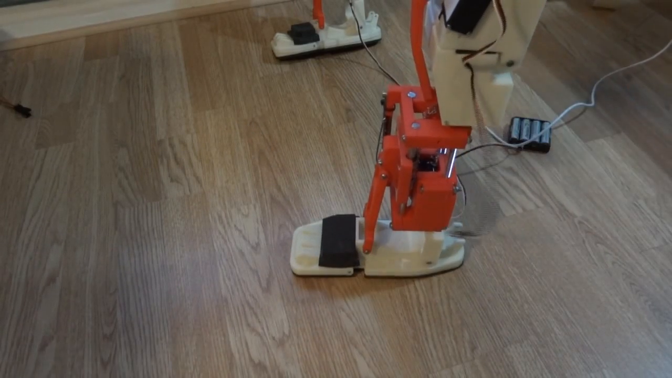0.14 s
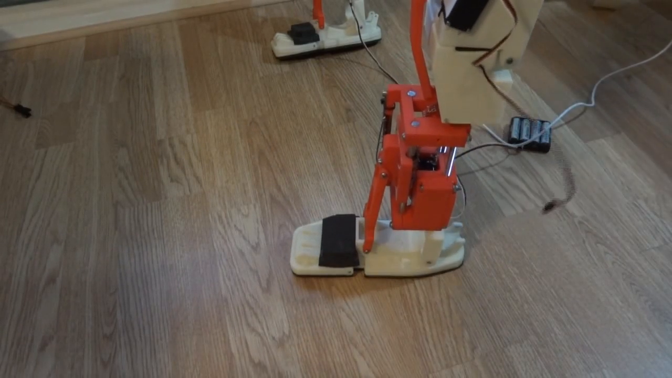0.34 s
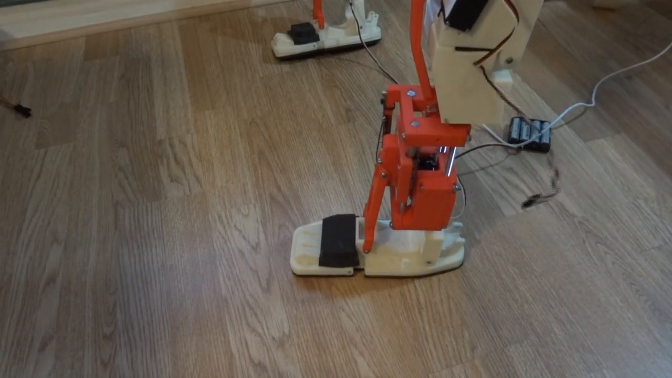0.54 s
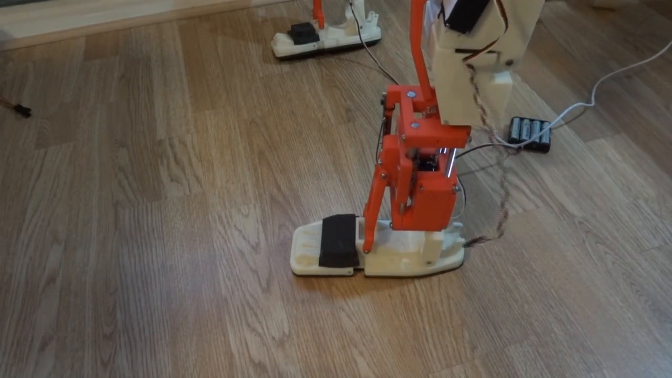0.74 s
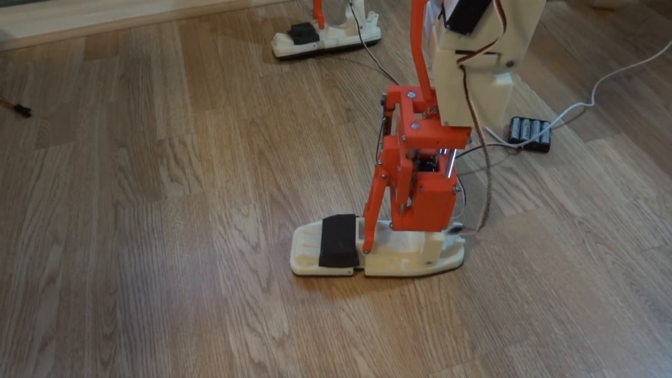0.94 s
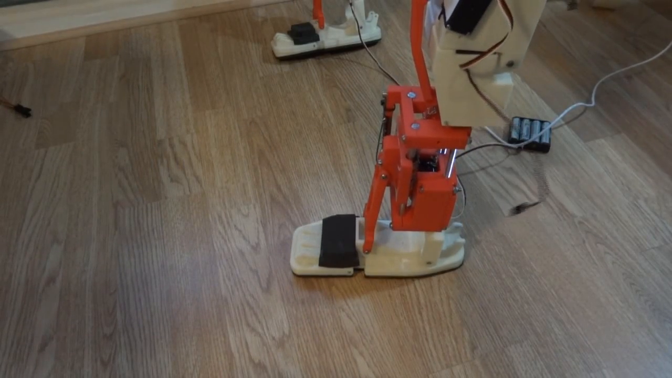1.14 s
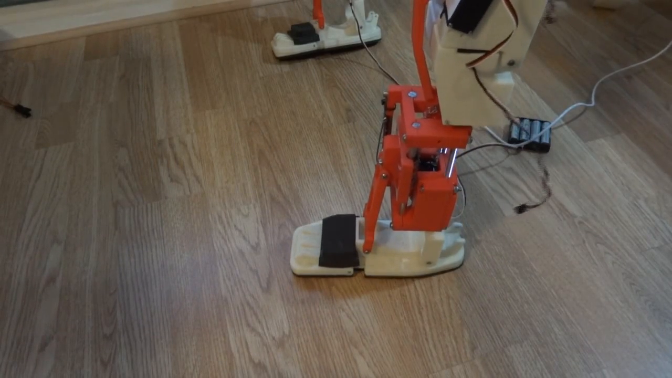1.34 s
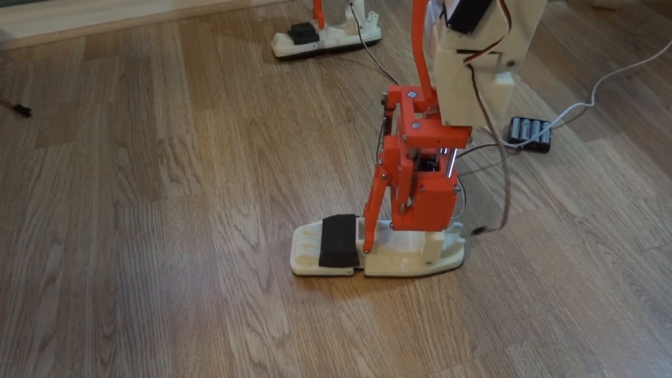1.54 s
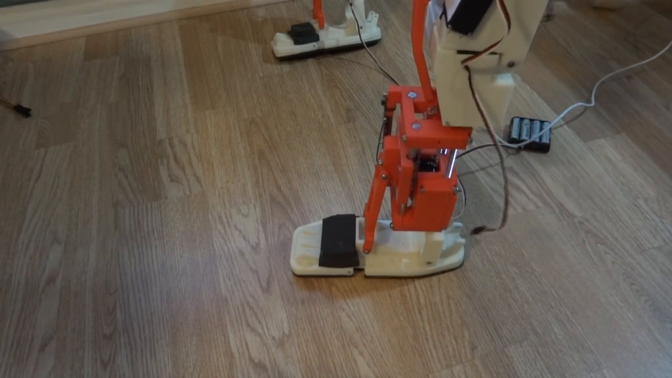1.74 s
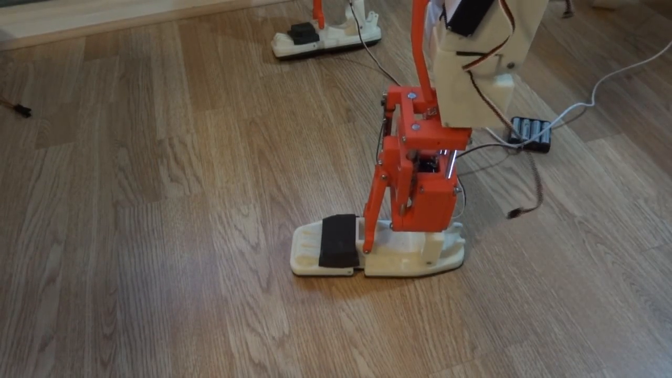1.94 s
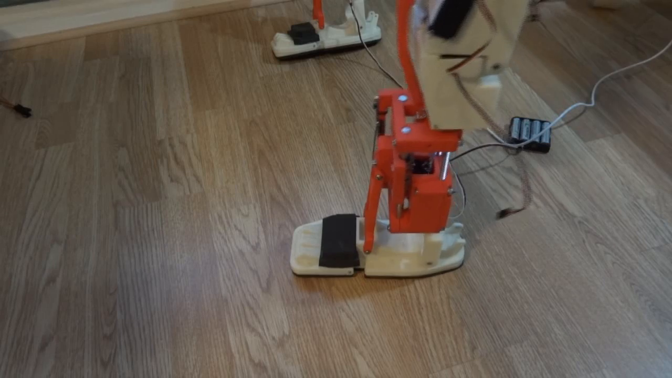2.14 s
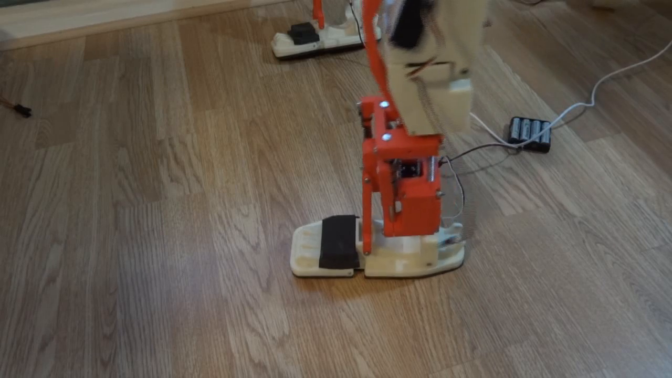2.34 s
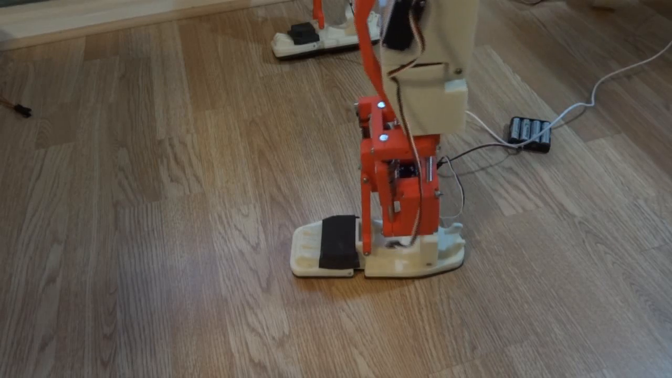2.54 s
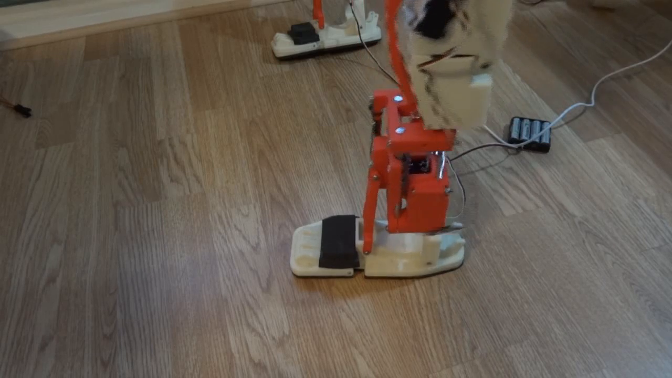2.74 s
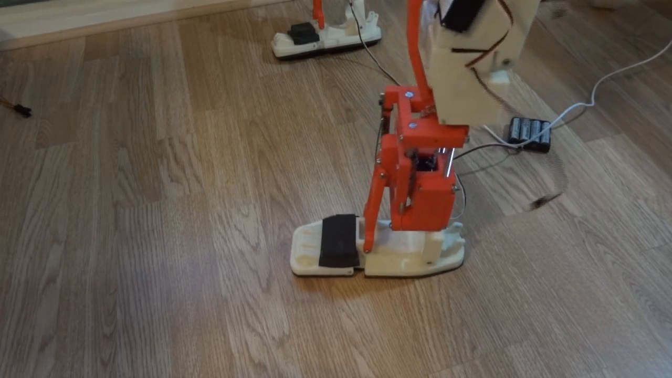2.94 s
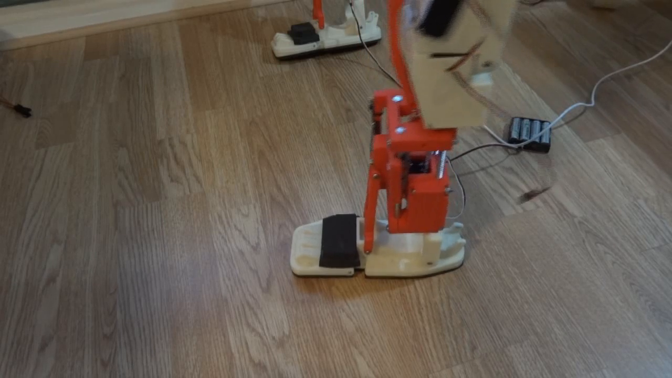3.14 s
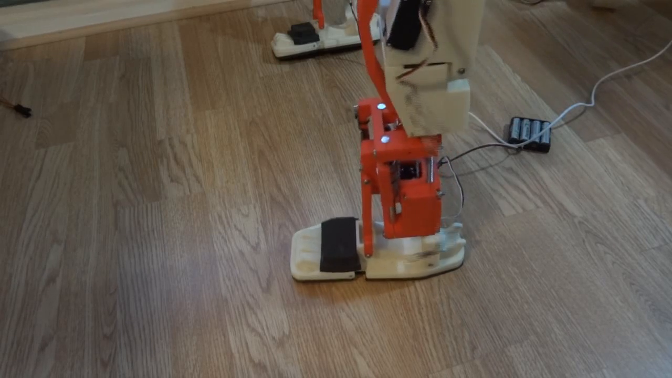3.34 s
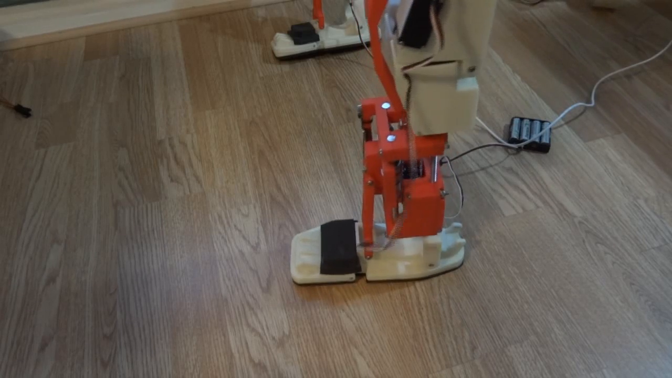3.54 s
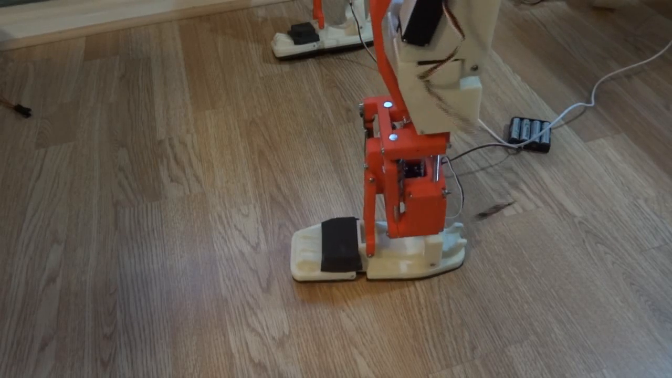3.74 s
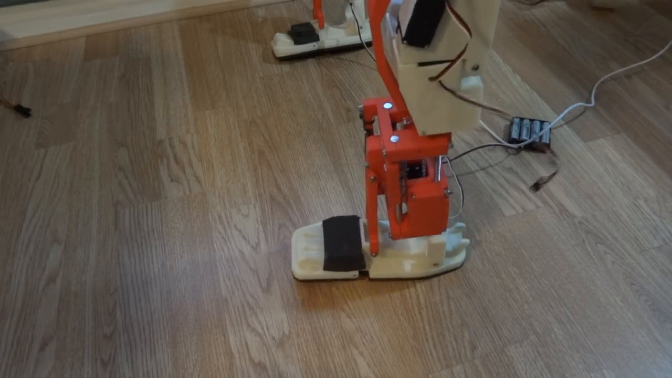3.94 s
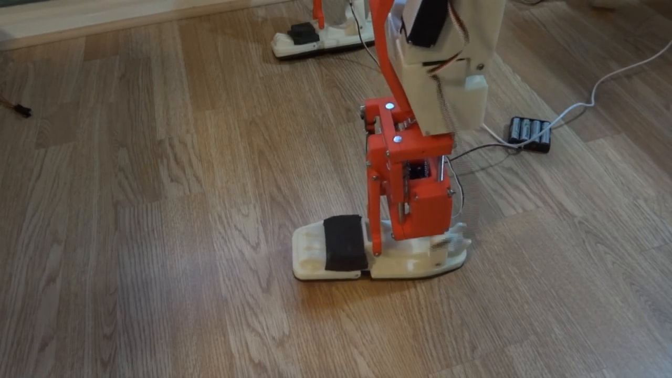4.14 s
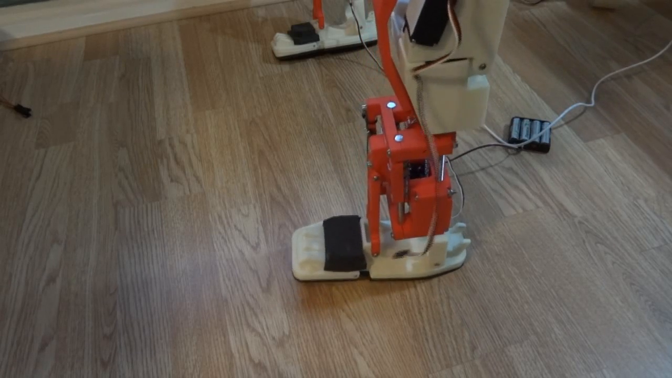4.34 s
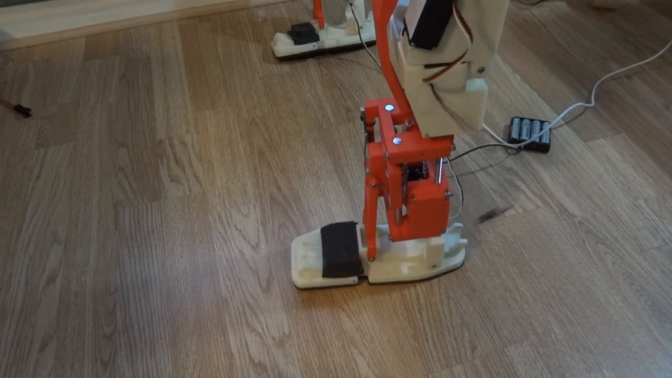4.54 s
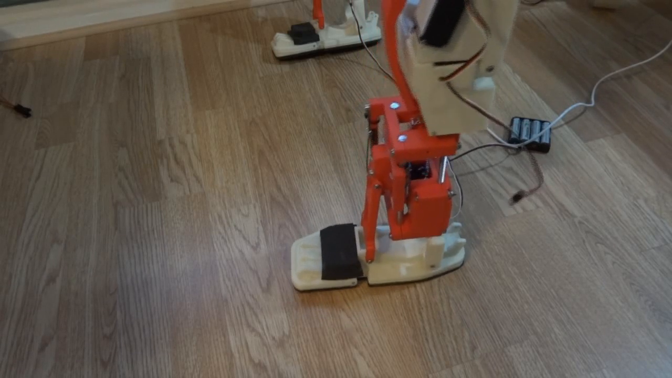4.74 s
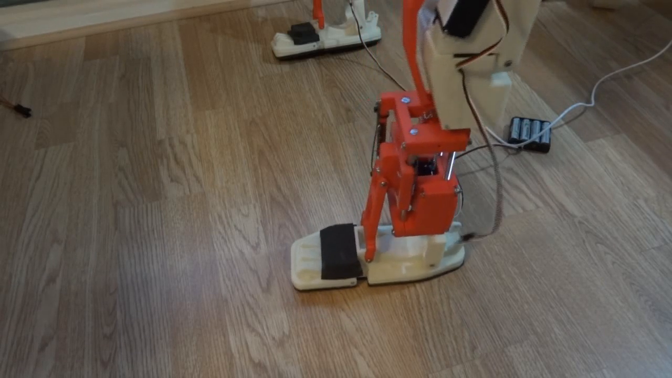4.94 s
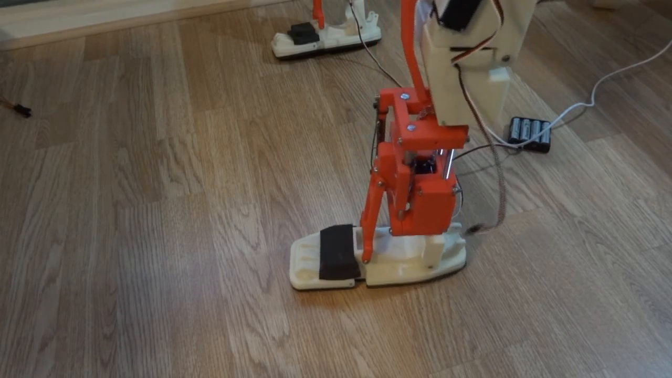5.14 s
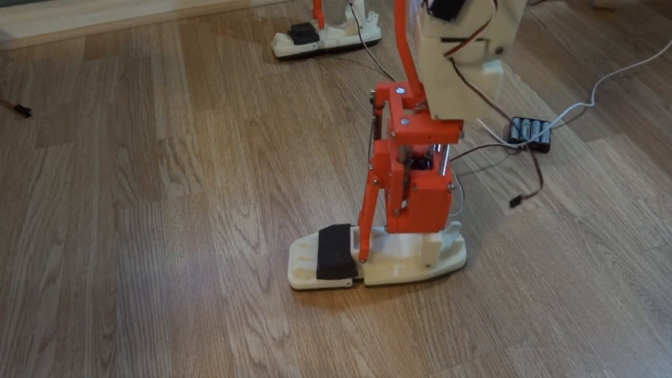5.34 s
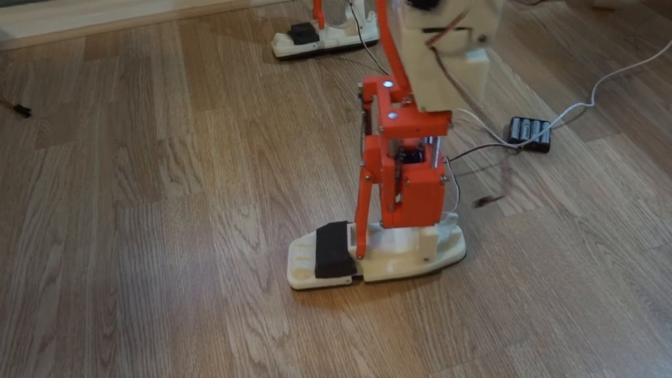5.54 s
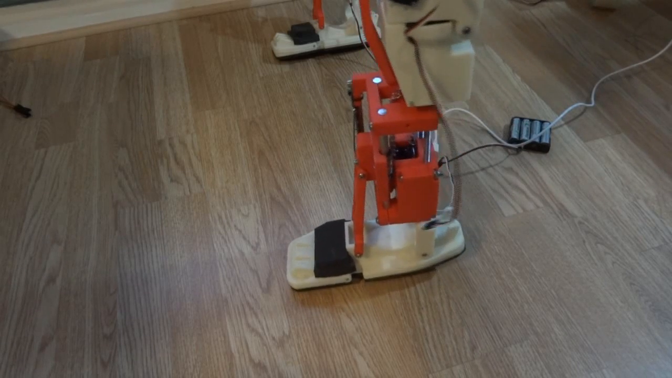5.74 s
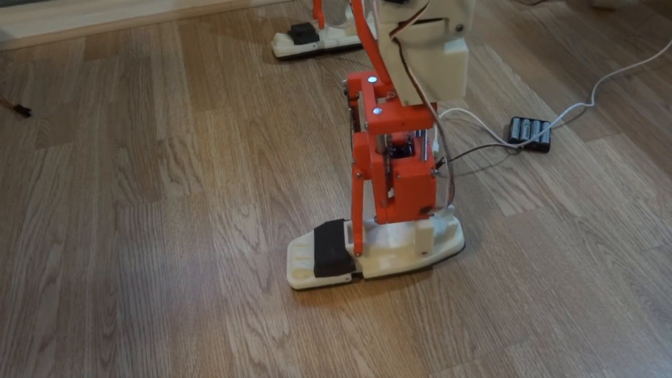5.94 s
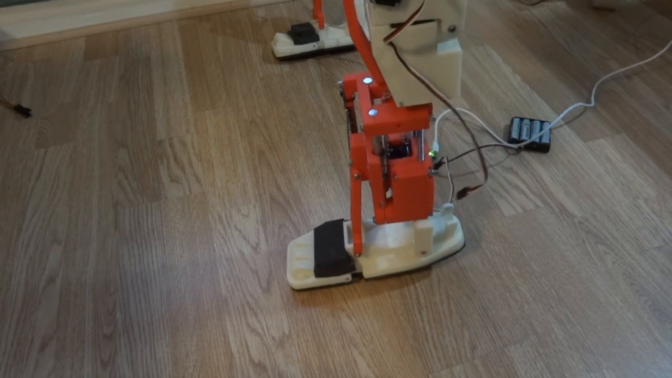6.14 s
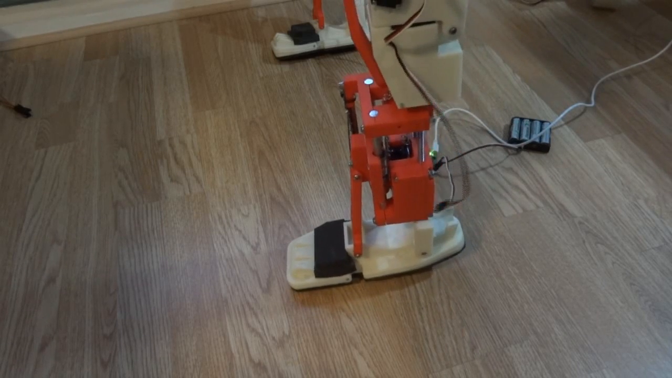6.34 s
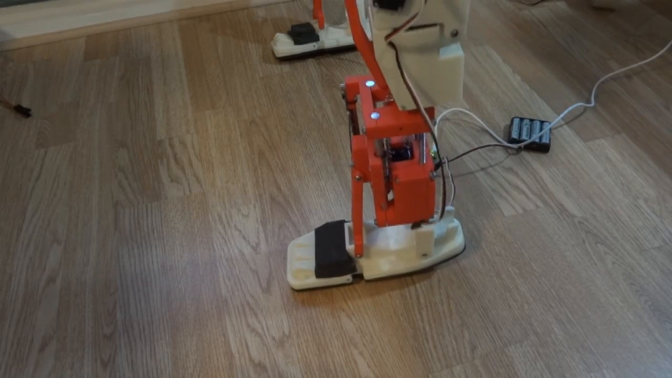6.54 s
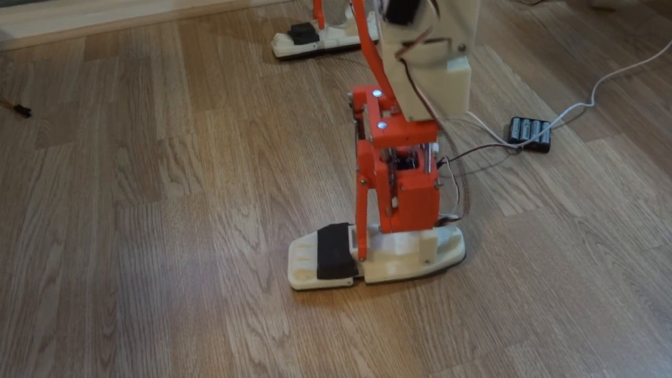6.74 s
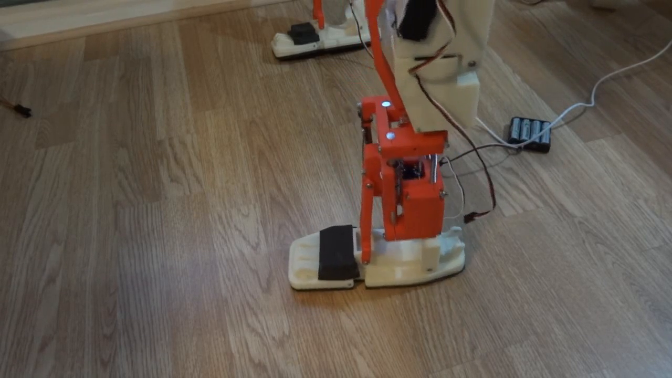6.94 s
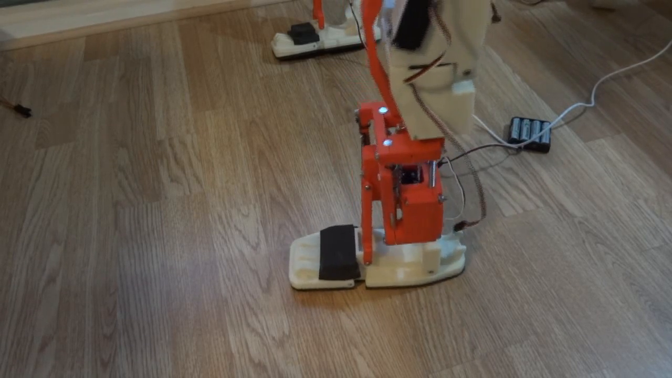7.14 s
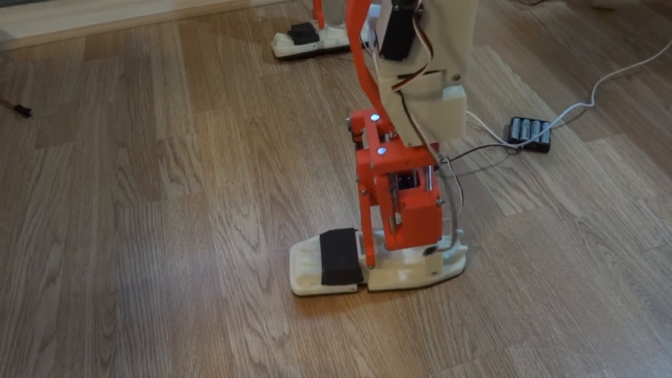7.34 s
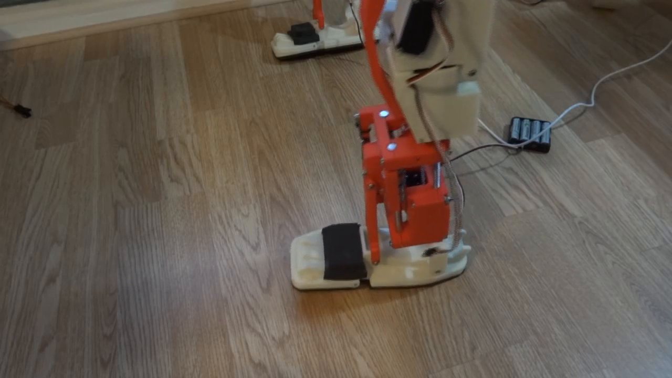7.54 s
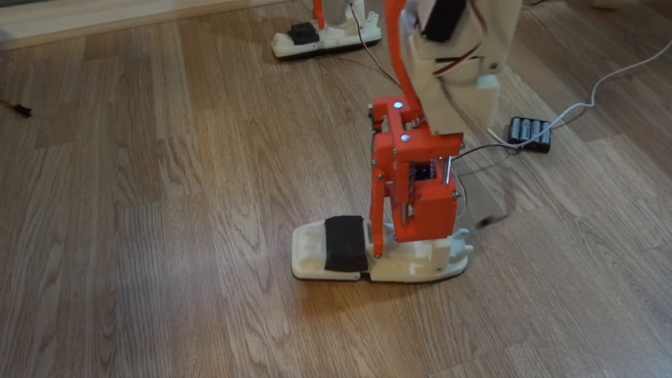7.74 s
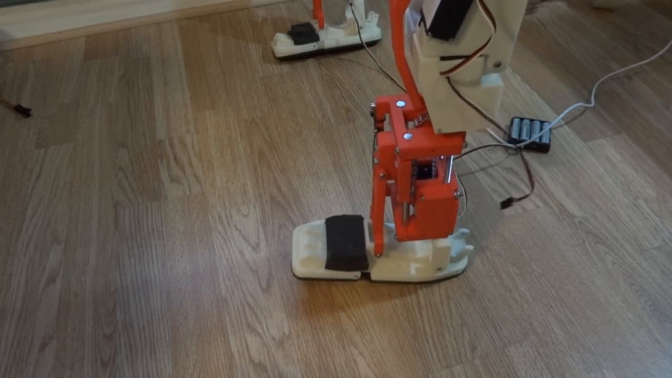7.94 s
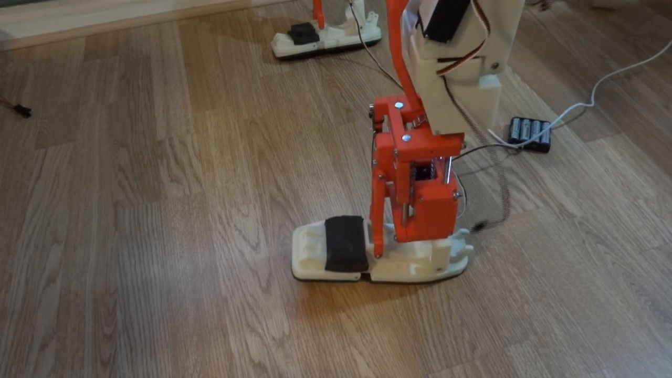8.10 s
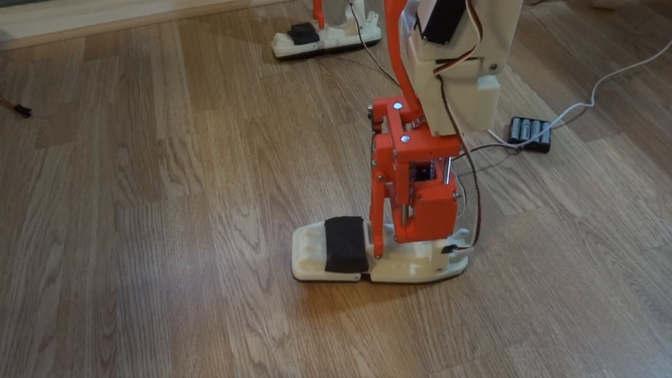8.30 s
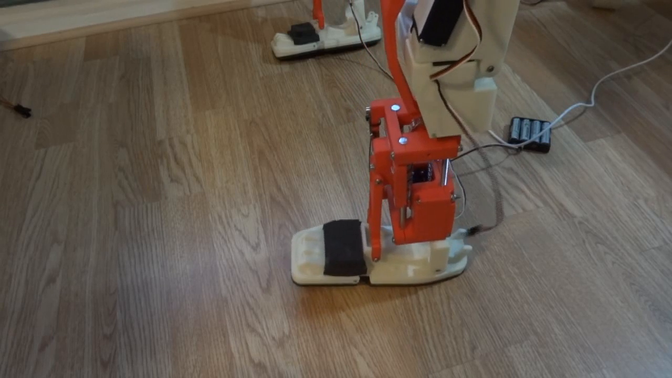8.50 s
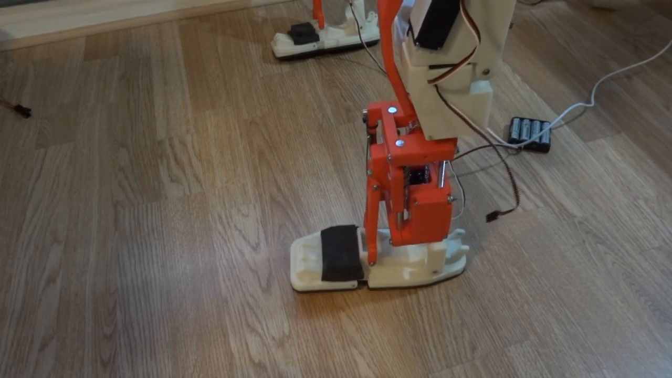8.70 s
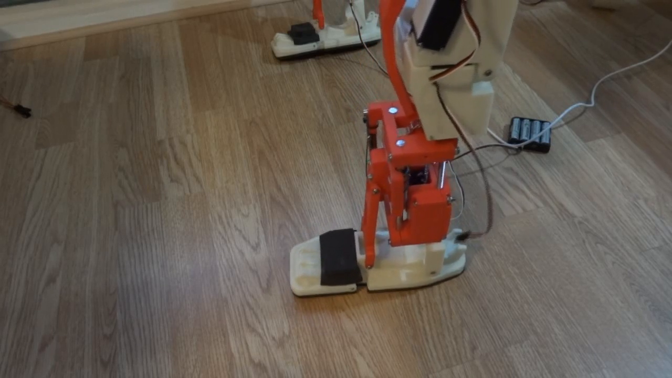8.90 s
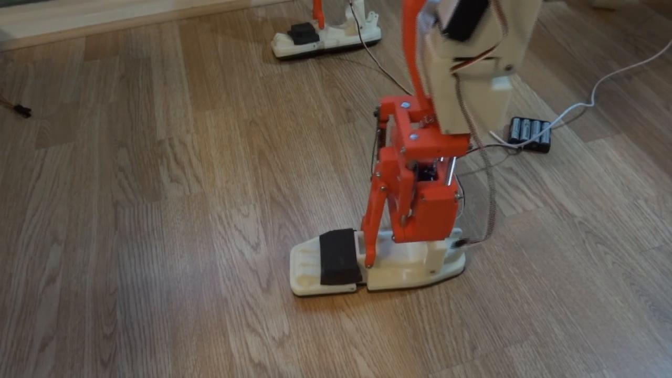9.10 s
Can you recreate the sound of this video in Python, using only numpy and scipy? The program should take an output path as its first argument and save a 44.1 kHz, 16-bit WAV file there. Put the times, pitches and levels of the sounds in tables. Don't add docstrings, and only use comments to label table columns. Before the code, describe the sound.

A robot ankle's small motors, heard closely on a wooden floor. First a low electrical buzz with dull knocks, cable scuffs and a dry plastic slip; then four brief gritty whines. Three longer runs follow, thin and rattly while climbing, louder and rougher as they slow down. Buzzing pauses, small ticks and soft board rumble lie between, over faint room hiss.

```python
import sys
import numpy as np
from scipy import signal
from scipy.fft import rfft, irfft, next_fast_len
from scipy.io import wavfile
from scipy.ndimage import uniform_filter1d

SR = 44100
rng = np.random.default_rng(int(sys.argv[2]) if len(sys.argv) > 2 else 0)


def generate_wav(signal):
    frames = np.transpose(np.atleast_2d(signal))
    scaled = np.clip(frames, -1, 1) * 32767
    pcm = np.round(scaled).astype(np.int16)
    wavfile.write(sys.argv[1], SR, pcm)


def convert_level_to_amplitude(level_db):
    exponent = np.asarray(level_db, float) / 20
    return 10 ** exponent


N = 404397

# pitch_hz, level_db (per Hz)
ROOM_NOISE = [(15, -36), (28, -16), (140, -5.5), (400, -7.5), (880, -11), (1050, 2), (1250, -13),
              (1700, -8), (2400, -16), (2900, -18.5), (5900, -24.5), (13000, -30.5), (15600, -33.5)]
# pitch_hz, likeness (1 = the same)
LIKENESS = [(60, 1), (240, 0.31), (950, 0.68), (3770, 0.67), (15000, 0.92)]
# pitch_hz, level_db
SUPPLY_LINES = [(6966, -69), (13932, -63.5)]
ROOM_DB, ROOM_FOLLOWS = -61.5, 0.18
ROOM_T60_S, WALL_CUT_HZ = 0.35, 8000

# time_s, deep_db, shaft_thud_db, board_db
SHIFTS = [(0.64, -73, -65, -63), (2.33, -51.5, -56, -61.5), (2.7, -59, -50, -58.5),
          (3.3, -50.5, -61, -55.5), (4.05, -54, -63.5, -58), (4.6, -59, -55.5, -59.5),
          (4.95, -58, -49.5, -57), (6.95, -70, -50, -60), (7.2, -52, -51.5, -49), (7.6, -55, -61.5, -55),
          (8.35, -62, -102, -49), (9.05, -62, -52, -55)]
SHIFT_RISE_DB_PER_S, SHIFT_FALL_DB_PER_S, REST_DB = [57, 44, 29], [91, 38, 23.5], [-80, -72.5, -73]

# time_s, peak_db, pitch_hz, crack_db (against the thump)
BUMPS = [(0.135, -37, 330, -8.5), (0.254, -55, 231, -4), (0.435, -44, 199, -18), (0.454, -34.5, 180, -27),
         (0.535, -35, 178, -24), (0.586, -30.5, 170, -28), (0.63, -37.5, 137, -20), (0.74, -36.5, 576, -12),
         (0.763, -32.5, 338, -18), (8.318, -65, 223, 8)]
# time_s, peak_db
SLIPS = [
    (1.588, -31),
    (1.5974, -38),
]
# time_s, low_db, high_db
SCUFFS = [
    (0.148, -63, -59),
    (0.598, -40.5, -53),
    (0.76, -48, -54.5),
]
SCUFF_RISE_DB_PER_S, SCUFF_FALL_DB_PER_S = [63, 36], [200, 58]
CONTACT = 14

# start_s, end_s, tooth_rate_hz, level_db
NEIGHBOUR = [
    (6.53, 6.64, 1500, -40.5),
    (3.655, 3.73, 1985, -35),
]

# start_s, end_s, first_db, last_db
HOLD = [
    (0, 1.46, -51.5, -50.5),
    (1.474, 1.937, -52, -52),
    (4.1, 4.345, -50, -47.5),
    (5.451, 5.634, -44.5, -56),
    (5.626, 6.599, -55, -45.5),
    (7.598, 8.478, -51.5, -52),
]
FRAME_HZ = 50.12
# time_ms, level_db
UPRIGHT = [(15.6, 0), (17.2, -4), (19.6, -7), (1.6, -4), (5.3, -9), (10.6, -15)]
# time_ms, level_db
LEANING = [(.6, 0), (2.8, -10), (4.2, -8), (8.4, -15), (12.6, -14), (17, -12), (18.2, -8)]
# pitch_hz, width_hz, level_db
HOLD_MODES = [(1078, 120, -8), (1506, 357, -2), (1578, 212, 6.5), (2380, 430, -16.5)]
# time_s, peak_db
TWITCHES = [(5.544, -40), (5.5851, -36.5), (5.647, -38), (5.668, -41), (5.7253, -38), (5.7662, -36.5),
            (5.846, -42), (5.866, -39.5), (5.904, -48), (5.964, -51), (5.9845, -43), (6.005, -41),
            (6.0242, -38), (6.0464, -36), (6.184, -42), (6.223, -43), (8.341, -44), (8.422, -38)]

# time_s, tooth_rate_hz
STEP_SPEED = [
    [(2.03, 1007), (2.085, 1323), (2.115, 1327), (2.16, 1270), (2.21, 1436), (2.27, 1423), (2.315, 1316),
     (2.39, 945), (2.44, 600)],
    [(2.555, 705), (2.59, 1083), (2.645, 1373), (2.765, 1521), (2.82, 1544), (2.905, 1508), (2.925, 1295),
     (2.955, 650)],
    [(2.97, 802), (2.99, 1150), (3.025, 1405), (3.065, 1503), (3.325, 1482), (3.355, 1390), (3.385, 1204),
     (3.42, 650)],
    [(3.67, 803), (3.695, 1150), (3.725, 1343), (3.765, 1433), (3.97, 1397), (4.01, 1334), (4.06, 1138),
     (4.11, 650)],
]
# time_s, tooth_rate_hz
SWING_SPEED = [
    [(4.31, 1147), (4.355, 1452), (4.39, 1634), (4.47, 1810), (4.68, 1814)],
    [(4.735, 1685), (4.92, 1288), (4.99, 1282), (5.075, 1083), (5.13, 944), (5.21, 1032), (5.3, 931)],
    [(6.6, 1210), (6.68, 1210), (6.755, 1300), (6.825, 1600), (6.885, 1743), (6.995, 1846), (7.09, 1872)],
    [(7.125, 1774), (7.18, 1618), (7.45, 1352), (7.515, 1225), (7.57, 896.5)],
    [(8.51, 1348), (8.595, 1405), (8.65, 1527), (8.735, 1474), (8.76, 1608), (8.8, 1626), (8.835, 1726),
     (8.915, 1676)],
    [(8.98, 1473), (9.15, 1333)],
]
# start_s, brake_s, low_whine_db, high_whine_db, rattle_db
LOADED = [
    (1.964, 2.398, -30, -24.5, -26.5),
    (2.542, 2.922, -27, -20, -25.5),
    (2.96, 3.37, -27.5, -22, -24.5),
    (3.649, 4.065, -30.5, -23, -23.5),
    (4.662, 5.283, -27.5, -21, -26.5),
    (7.093, 7.558, -29, -24, -24.5),
    (8.913, 9.3, -29, -23.5, -27.5),
]
RISE_S = [0.075, 0.029, 0.045, 0.049, 0.093, 0.027, .08]
SHUDDER = [.4, .1, .05, .1, .22, .12, .4]
# start_s, end_s, whine_db, rattle_db, clatter_db
FREE = [
    (3.475, 3.612, -95, -48, -45.5),
    (4.313, 4.707, -62, -45.5, -48.5),
    (5.28, 5.431, -95, -34, -49.5),
    (6.53, 6.954, -44, -37.5, -44.5),
    (8.481, 8.933, -61.5, -45, -48),
]
SLACK_DB = [0, 12, 0, 2, 11]
# time_s, level_db
JOLTS = [
    (1.974, -38),
    (4.29, -36),
    (6.522, -42),
    (8.42, -46),
    (8.44, -37),
]
JOLT_RISE_S, JOLT_HOLD_S, JOLT_DB_PER_S = .006, .022, 270
JOLT_CLATTER_DB, JOLT_HISS_DB = -12.5, -26

NOMINAL_HZ = 1500
COAST_DB_PER_S, UNMESH_DB_PER_S = 155, 220
BRAKE_DB, BRAKE_S = 3.5, 0.076
STALL_HZ, STALL_DB_PER_OCT = 1348, 32.5
TAKE_UP_MESH_S = 0.085
MESH_LAG_S, MESH_RISE_S, MESH_LEAD_S = 0.017, 0.093, 0.031
CLATTER_DB, CLATTER_DB_PER_OCT = -53.5, -13
HISS_DB, FREE_HISS_DB, HISS_DB_PER_OCT = -50, -55, 11
FIRST_DB, FIRST_DB_PER_OCT = -17.5, 39
FREE_HIGH_DB, FREE_WHINE_DB_PER_OCT = -3, -10
FREE_RISE_S, FREE_DB_PER_OCT = .05, -0.5

# pitch_hz, level_db
WHINE = [(1500, -7.5), (2900, 4.5), (3600, -1), (4500, 3.5), (5500, -4), (7000, -6), (9000, -6),
         (11500, -14.5), (15500, -43)]
# tooth_rate_multiple, level_db (against
HIGH_ORDERS = [(6.28, -13), (6.6, -9), (7.3, -15)]
# tooth_rate_multiple, level_db (against the tooth rate tone)
SIDE_ORDERS = [(0.898, -12), (1.1, -6.5), (1.302, -16), (1.5, -5), (2.399, -9.5), (2.5, -20)]
# pitch_hz, width_hz, level_db
CASE_MODES = [(1683, 230, -1), (1897, 68, -2.5), (2210, 80, 0.5), (2530, 68, 2.5), (2935, 240, 3),
              (3605, 150, -7.5)]
# pitch_hz, level_db (per Hz)
RATTLE = [(350, -37.5), (600, -37.5), (807, -55), (1020, -16), (1220, -16), (1600, -21.5), (2350, -9.5),
          (3000, -6), (3320, -2.5), (4530, 3.5), (7770, -1.5), (9180, -3), (13000, -12.5)]
TOP_HZ = 15760


def rms_one(x):
    return x / np.sqrt(np.mean(x ** 2) + 1e-20)


def in_time(rows):
    s, *columns = np.transpose(rows)
    return [np.interp(np.arange(N) / SR, s, c) for c in columns]


def at_hz(points, hz):
    points = np.array(points)
    return np.interp(np.log(hz), np.log(points[:, 0]), points[:, 1])


def drift(rate):
    r = np.exp(-40 * np.pi * rate / SR)
    slow = signal.lfilter([1], [1, -2 * r, r * r], rng.standard_normal(N // 20 + 2002))[2000:]
    return np.interp(np.arange(N) / 20, np.arange(len(slow)), rms_one(slow))


def resonate(x, hz, width):
    r = np.exp(-np.pi * width / SR)
    top = np.array([1, 0, -1]) * (1 - r * r) / 2
    return signal.lfilter(top, [1, -2 * r * np.cos(2 * np.pi * hz / SR), r * r], x + 1e-18)


def colour(x, spectrum):
    size = next_fast_len(N)
    hz = np.maximum(np.arange(size // 2 + 1) * SR / size, 1)
    return rms_one(irfft(rfft(x, size) * convert_level_to_amplitude(at_hz(spectrum, hz)), size)[..., :N])


def band(low_hz, high_hz):
    sos = signal.butter(2, [low_hz, high_hz], "band", fs=SR, output="sos")
    return rms_one(signal.sosfilt(sos, rng.standard_normal(N)))


def swells(rows, rise_db_per_s, fall_db_per_s):
    t = np.arange(0, N + 64, 64)[:, None] / SR
    levels = []
    for s, *db in rows:
        away_db = np.maximum((s - t) * rise_db_per_s, (t - s) * fall_db_per_s)
        levels.append(np.array(db) - away_db)
    return np.array(in_time(np.c_[t, np.max(levels, axis=0)]))


def stroke(start, end, rise_s, fall_db_per_s):
    t = np.arange(N) / SR
    return np.clip((t - start) / rise_s, 0, 1) * convert_level_to_amplitude(-fall_db_per_s * np.maximum(t - end, 0))


def floor_levels():
    shifts = swells(SHIFTS, SHIFT_RISE_DB_PER_S, SHIFT_FALL_DB_PER_S)
    return np.maximum(shifts, np.array(REST_DB)[:, None])


def ambience():
    room_db = ROOM_DB + ROOM_FOLLOWS * (floor_levels()[2] - REST_DB[2])
    hz = np.geomspace(20, 20000, 40)
    alike = np.clip(at_hz(LIKENESS, hz), -.999, .999)
    level_db = at_hz(ROOM_NOISE, hz)
    side_db = level_db + 10 * np.log10((1 - alike) / (1 + alike))
    mid = colour(rng.standard_normal(N), np.c_[hz, level_db])
    side = colour(rng.standard_normal(N), np.c_[hz, side_db])
    t = np.arange(N) / SR
    whistle = sum(convert_level_to_amplitude(db - 10.0 + drift(8)) * np.sin(2 * np.pi * f * t) for f, db in SUPPLY_LINES)
    return convert_level_to_amplitude(room_db + 6.0) * (mid + convert_level_to_amplitude(-5.5) * side * [[1], [-1]]) + whistle


def room(x):
    size = next_fast_len(N + SR)
    w = 2 * np.pi * np.arange(size // 2 + 1) / size
    dull = 1 / (1 + 1j * w * SR / (2 * np.pi * WALL_CUT_HZ))
    sides = np.zeros((2, len(w)), complex)
    for k, lag in enumerate((rng.uniform(.012, .04, 16) * SR).astype(int)):
        loop = convert_level_to_amplitude(-60 * lag / SR / ROOM_T60_S) * dull * np.exp(-1j * w * lag)
        sides[k % 2] += loop / (1 - loop) * (-1) ** (k // 2)
    mid, side = sides
    return irfft(rfft(x, size) * [mid + 0.29 * side, mid - 0.17 * side], size)[:, :N]


def boards(shaft):
    deep_db, thud_db, board_db = floor_levels()
    thud = 0.57 * shaft * convert_level_to_amplitude(1.2 * drift(3.3)) + 1.3 * band(115, 156)
    deep = convert_level_to_amplitude(deep_db) * band(50.6, 59.4)
    return deep + convert_level_to_amplitude(thud_db) * thud + convert_level_to_amplitude(board_db) * band(207.0, 247.6)


def hand():
    out, t = np.zeros(N), np.arange(6000) / SR
    for s, peak_db, hz, crack_db in BUMPS:
        noise = rng.standard_normal((2, 6000))
        noise[:, 60] += CONTACT
        thump = rms_one(resonate(noise[0], hz, 160) + 0.5 * resonate(noise[0], 670, 270))
        thump *= np.minimum(t / 0.0026, 1) * convert_level_to_amplitude(-60 * t / 0.084 - 5.0)
        crack = np.diff(noise[1], prepend=0) * convert_level_to_amplitude(crack_db - 2.5 - 60 * t / 0.05)
        out[round(s * SR):][:6000] += convert_level_to_amplitude(peak_db) * (thump + crack)
    low_db, high_db = swells(SCUFFS, SCUFF_RISE_DB_PER_S, SCUFF_FALL_DB_PER_S)
    out += convert_level_to_amplitude(low_db - 8 + 3.5 * drift(24)) * band(110, 420)
    out += convert_level_to_amplitude(high_db + 2 * drift(60)) * band(1300, 8300)
    for s, peak_db in SLIPS:
        since = np.arange(N) / SR - s
        fade = (since > 0) * convert_level_to_amplitude(peak_db - 19 - 60 * np.abs(since) / 0.33)
        out += (band(5700, 7600) + 0.94 * band(2500, 9900)) * fade
    return out


def neighbour():
    t, out = np.arange(N) / SR, np.zeros(N)
    for start, end, hz, level_db in NEIGHBOUR:
        fade = np.sin(np.pi * np.clip((t - start) / (end - start), 0, 1))
        for k in range(1, 5):
            tone = np.sin(2 * np.pi * k * hz * t + drift(25.03))
            out += fade * convert_level_to_amplitude(level_db - 4.8 * k + 3.1 * drift(30)) * tone
    return out


def holding(uneven_db=1.2):
    t, buzz, kicks = np.arange(N) / SR, np.zeros(N), np.zeros(N)
    for start, end, first_db, last_db in HOLD:
        buzz += (t >= start) * (t < end) * convert_level_to_amplitude(np.interp(t, [start, end], [first_db, last_db]))
    frames = np.arange(int(N / SR * FRAME_HZ) - 1) / FRAME_HZ
    for pattern, active in ((UPRIGHT, frames < 3), (LEANING, frames >= 3)):
        train = np.zeros(N)
        for ms, level_db in pattern:
            at = np.round((frames[active] + ms / 1000) * SR).astype(int)
            train[at] = convert_level_to_amplitude(level_db + uneven_db * rng.standard_normal(len(at)))
        first, *_, last = train.nonzero()[0]
        kicks += train / np.std(train[first:last])
    kicks *= uniform_filter1d(buzz, size=1500) * convert_level_to_amplitude(13.5)
    kicks[[round(s * SR) for s, db in TWITCHES]] += convert_level_to_amplitude(np.array(TWITCHES)[:, 1] + 35.0)
    out = np.zeros(N)
    for k, (hz, width, db) in enumerate(HOLD_MODES):
        out += convert_level_to_amplitude(db) * resonate(resonate(kicks, hz, width), hz, 2.1 * width) * (-1) ** k
    return out


def drive():
    t = np.arange(N) / SR
    speed = sorted(np.concatenate(STEP_SPEED + SWING_SPEED).tolist())
    tooth_hz = uniform_filter1d(in_time(speed)[0], size=900)
    octaves = np.maximum(np.log2(tooth_hz / NOMINAL_HZ), -.6)
    layers = np.full((6, N), 1e-6)
    shudder = np.interp(t, np.array(LOADED)[:, :2].ravel(), np.repeat(SHUDDER, 2))
    for (start, end, low_db, high_db, rattle_db), rise_s in zip(LOADED, RISE_S):
        running = octaves[round(start * SR)] > 0
        lag_s, mesh_s = (0, TAKE_UP_MESH_S) if running else (MESH_LAG_S, MESH_RISE_S)
        mesh = stroke(start + lag_s, end - MESH_LEAD_S, mesh_s, UNMESH_DB_PER_S)
        mesh = mesh * convert_level_to_amplitude(STALL_DB_PER_OCT * np.minimum(np.log2(tooth_hz / STALL_HZ), 0))
        run = stroke(start, end, rise_s, COAST_DB_PER_S)
        brake_db = BRAKE_DB * np.exp(-((t - end) / BRAKE_S) ** 2)
        layers[0] += mesh * convert_level_to_amplitude(low_db + FIRST_DB + FIRST_DB_PER_OCT * octaves)
        layers[1:3] += mesh * convert_level_to_amplitude(np.c_[[low_db, high_db]])
        layers[3] += run * convert_level_to_amplitude(CLATTER_DB + CLATTER_DB_PER_OCT * octaves)
        layers[4] += run * convert_level_to_amplitude(rattle_db + brake_db)
        layers[5] += run * convert_level_to_amplitude(HISS_DB + HISS_DB_PER_OCT * octaves)
    for (start, end, whine_db, rattle_db, clatter_db), slack_db in zip(FREE, SLACK_DB):
        mesh = stroke(start + MESH_LAG_S, end, MESH_RISE_S, UNMESH_DB_PER_S)
        run = stroke(start, end, FREE_RISE_S, COAST_DB_PER_S)
        layers[0] += mesh * convert_level_to_amplitude(whine_db + slack_db + FIRST_DB_PER_OCT * np.minimum(octaves, 0))
        layers[1:3] += mesh * convert_level_to_amplitude(whine_db + FREE_WHINE_DB_PER_OCT * octaves + np.c_[[0, FREE_HIGH_DB]])
        layers[3:5] += run * convert_level_to_amplitude(np.c_[[clatter_db, rattle_db]] + FREE_DB_PER_OCT * octaves)
        layers[5] += run * convert_level_to_amplitude(FREE_HISS_DB + HISS_DB_PER_OCT / 2 * octaves)
    for start, jolt_db in JOLTS:
        jolt = stroke(start, start + JOLT_HOLD_S, JOLT_RISE_S, JOLT_DB_PER_S)
        layers[3:] += convert_level_to_amplitude(jolt_db + np.c_[[JOLT_CLATTER_DB, 0, JOLT_HISS_DB]]) * jolt
    return tooth_hz, shudder, 20 * np.log10(layers)


def rough_order(phase, rough):
    return (1 + rough * drift(190)) * np.sin(phase) + rough * drift(100) * np.cos(phase)


def tooth_rattle(turn, clatter_db, rattle_db, hiss_db, gating=0.17):
    bursts = rng.standard_normal(N) * (1 + gating * np.cos(turn)) * convert_level_to_amplitude(2.0 * drift(200))
    noise = convert_level_to_amplitude(rattle_db - 8 + .5 * drift(21.9)) * colour(bursts, RATTLE)
    ringing = np.zeros(N)
    for hz, width, db in CASE_MODES:
        ringing += convert_level_to_amplitude(db + 3.2 * drift(22)) * resonate(bursts, hz, .7 * width) / np.sqrt(width)
    noise += convert_level_to_amplitude(clatter_db + 2.5) * rms_one(rms_one(ringing) + 0.11 * band(1000, 2000))
    return noise + convert_level_to_amplitude(hiss_db + 9.0) * band(11760, 20000)


def motor(wobble=.002, wheel_depth=0.39, shaft_depth=0.16, flutter_db=3.0, loose_db=4, rough=0.017):
    tooth_hz, shudder, levels = drive()
    first_db, low_db, high_db, clatter_db, rattle_db, hiss_db = levels
    slowness = np.minimum((1500 / tooth_hz) ** 5.5, 9)
    turn = 2 * np.pi * np.cumsum(tooth_hz * (1 + wobble * slowness * drift(50))) / SR
    shaft, wheel = turn / 10, turn / 62
    tones = convert_level_to_amplitude(first_db + 4.0 + flutter_db * drift(24)) * np.sin(turn)
    tones *= 1 + wheel_depth * np.sin(wheel)
    lurch = shudder * (1 + .5 * drift(6)) * np.sin(turn / 21 + drift(8))
    slack = np.clip((first_db - low_db + 12) / 16, 0, 1) * (first_db > -70)
    for multiple, level_db in SIDE_ORDERS:
        side_db = first_db + level_db + 9.6 * slack - 8 + loose_db * drift(36.9)
        tones += convert_level_to_amplitude(side_db) * np.sin(multiple * turn + 0.43 * drift(28))
    for multiple, level_db in HIGH_ORDERS:
        tones += slack * convert_level_to_amplitude(hiss_db + level_db + flutter_db * drift(16)) * np.sin(multiple * turn)
    for k in range(2, 12):
        level_db = low_db - 1 - 7 * slack * (k - 2) if k < 4 else high_db - 3
        colour_db = at_hz(WHINE, k * tooth_hz) - 80 * (k * tooth_hz > TOP_HZ)
        sway = 1 + wheel_depth * np.sin(wheel + rng.uniform(0, 8.7))
        sway *= 1 + shaft_depth * np.sin(shaft + rng.uniform(0, 3.3))
        order = rough_order(k * (turn + lurch), np.minimum(rough * k * slowness, 2))
        tones += convert_level_to_amplitude(level_db + colour_db + flutter_db * drift(19.5)) * sway * order
    return tones + tooth_rattle(turn, clatter_db, rattle_db, hiss_db), np.sin(shaft)


def scene():
    whine, shaft = motor()
    near = whine + neighbour() + holding() + hand()
    return near + convert_level_to_amplitude(-9.5) * room(near) + boards(shaft) + ambience()


def band_limit(x):
    return signal.sosfilt(signal.butter(12, 15670, fs=SR, output="sos"), x)


def record(dry):
    top_cut = signal.cheby2(16, 45, TOP_HZ, fs=SR, output="sos")
    return band_limit(signal.sosfilt(top_cut, dry))


dry = scene()
out = record(dry)
generate_wav(out)
```